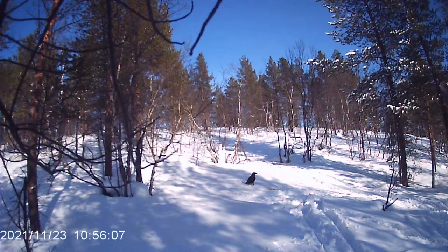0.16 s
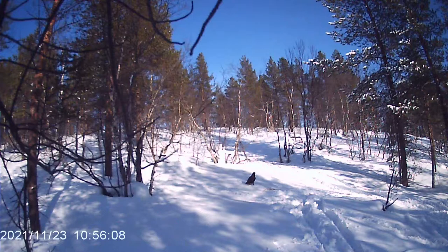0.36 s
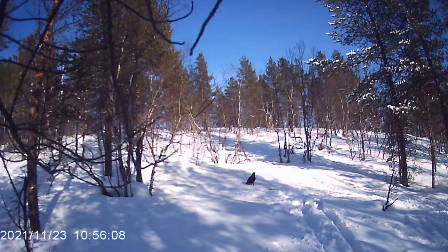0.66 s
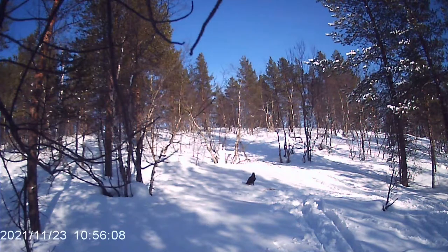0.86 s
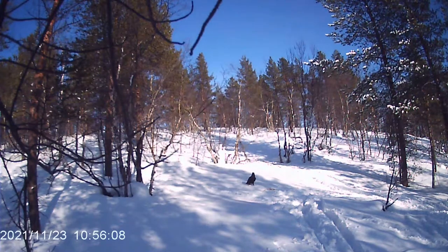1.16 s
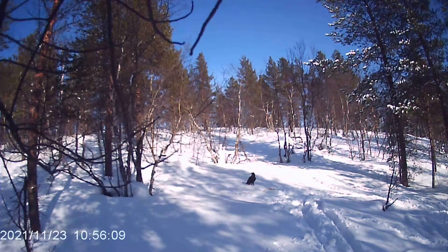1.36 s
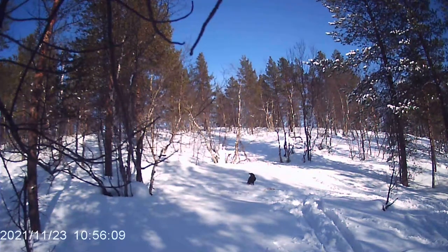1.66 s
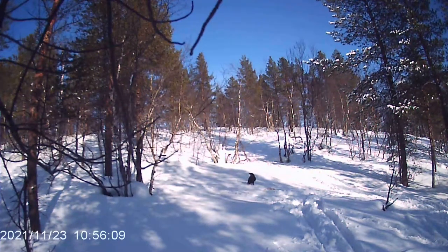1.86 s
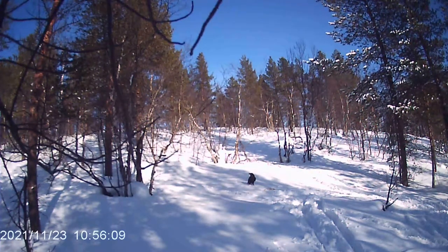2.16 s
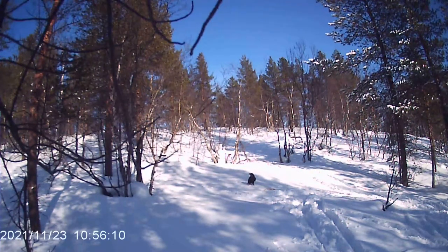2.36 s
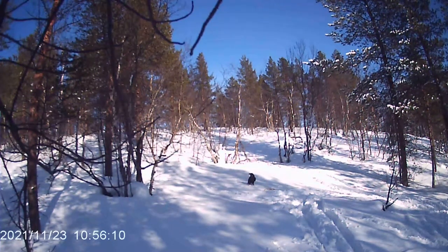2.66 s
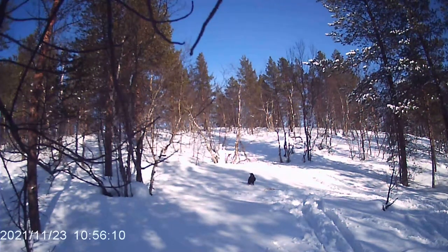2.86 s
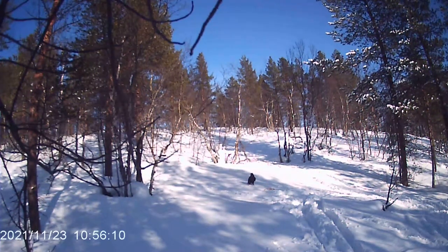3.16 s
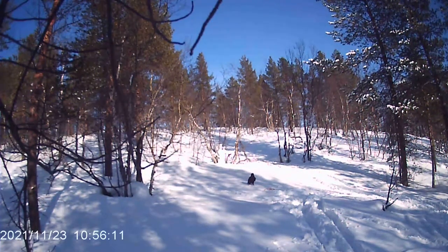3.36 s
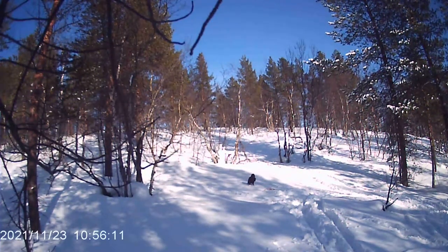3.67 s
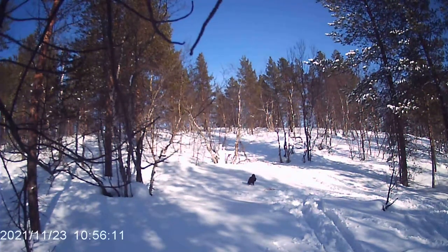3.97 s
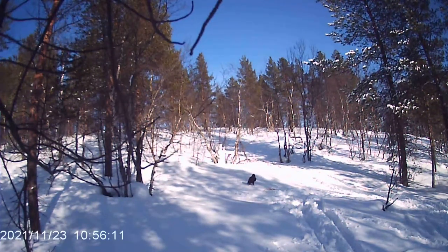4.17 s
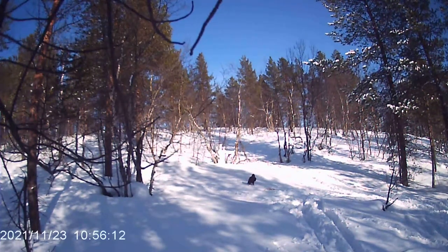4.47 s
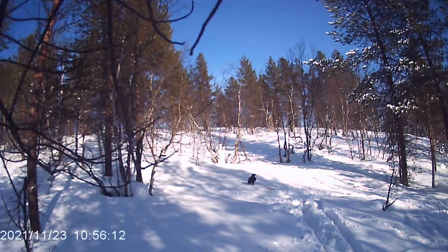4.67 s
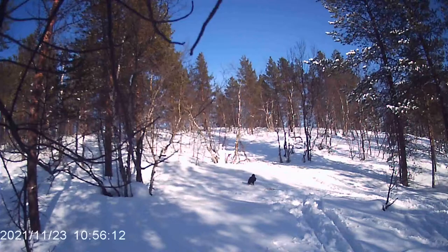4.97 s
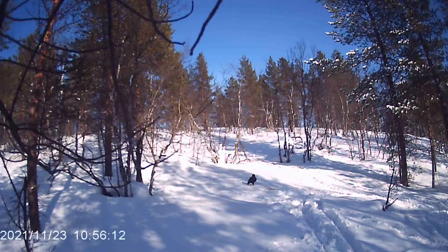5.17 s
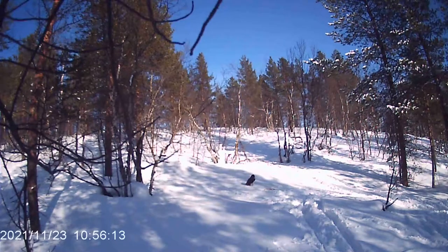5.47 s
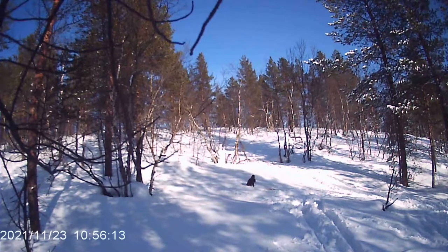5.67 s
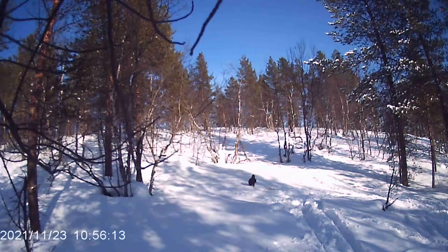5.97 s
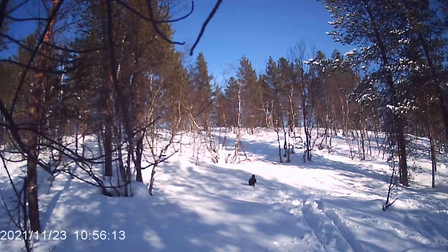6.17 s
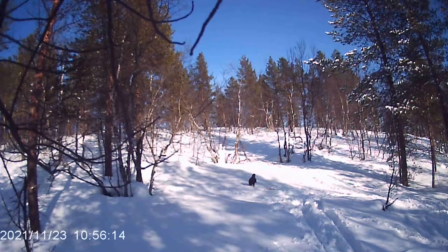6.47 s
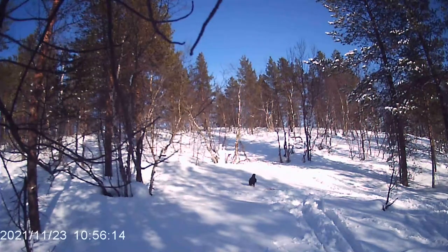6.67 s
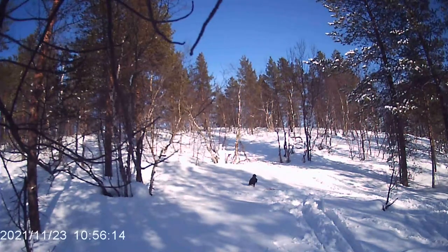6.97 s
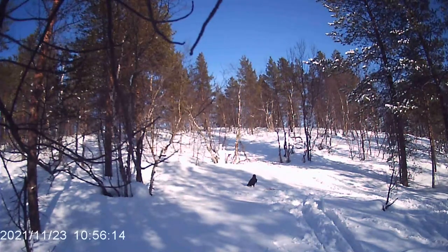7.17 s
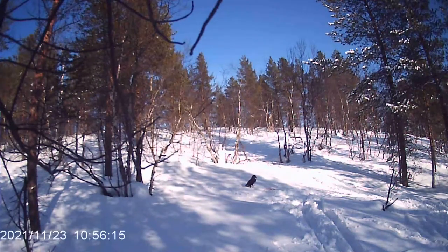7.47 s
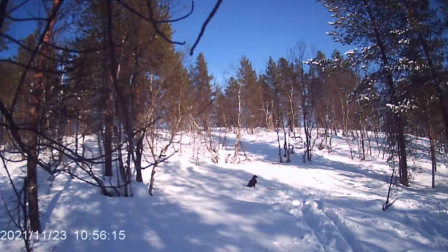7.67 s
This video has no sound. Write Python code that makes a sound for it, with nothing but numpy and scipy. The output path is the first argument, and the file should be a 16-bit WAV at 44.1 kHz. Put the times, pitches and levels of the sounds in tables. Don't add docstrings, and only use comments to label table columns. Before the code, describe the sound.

Outdoors in a snowy wood, a camera's steady hiss and thin buzzing whine lie under everything. Small tits give quick, high, dipping whistles and raspy nasal notes, mostly in the first three seconds. Icy twigs snap and tick. Midway a raven utters two short, rattling croaks close together, the second slightly louder, with a soft forest echo. Late on, two nasal tit notes answer each other.

```python
import sys
import numpy as np
from scipy import signal
from scipy.fft import rfft, irfft
from scipy.io import wavfile
from scipy.ndimage import uniform_filter1d

SR = 44100
rng = np.random.default_rng(int(sys.argv[2]) if len(sys.argv) > 2 else 0)


def put_to_file(sound):
    columns = np.atleast_2d(sound).T
    safe = np.clip(columns, -1, 1)
    whole_steps = np.round(safe * 32767)
    wavfile.write(sys.argv[1], SR, whole_steps.astype(np.int16))


def gain_from_decibels(decibels):
    exponent = np.asarray(decibels, float) / 20
    return 10 ** exponent


N = 345303


def band(x, hz, width_hz):
    edges = np.clip([hz - width_hz / 2, hz + width_hz / 2], 20, .45 * SR)
    y = signal.sosfilt(signal.butter(2, edges, "band", fs=SR, output="sos"), x)
    return y / np.std(y)


def add(out, start_s, piece):
    i = int(start_s * SR)
    out[i:i + len(piece)] += piece[:N - i]


def tone(hz):
    return np.sqrt(2) * np.sin(2 * np.pi * np.cumsum(hz) / SR)


def note(points):
    s, hz, db = np.transpose(points)
    t = np.arange(s[0], s[-1], 1 / SR)
    ends = np.clip(np.minimum(t - s[0] + 0.0034, s[-1] - t) / 0.001, 0, 1)
    pitch_hz = uniform_filter1d(np.interp(t, s, hz), size=60, mode="nearest")
    return pitch_hz, gain_from_decibels(np.interp(t, s, db)) * ends


# start_s, burst_spacing_s, peak_db, top_pitch_hz, bursts_to_full_effort
CROAKS = [
    (4.496, .0256, -39, 506, 4.7),
    (4.9295, .0254, -36.5, 495.3, 3.56),
]
BURSTS = 9


def bursts():
    rows, k = [], np.arange(BURSTS)
    short_s, long_s = 0.0118, 0.0174
    slack_click_db, full_click_db = -2, -16
    for start_s, spacing_s, peak_db, top_hz, full in CROAKS:
        late, loud, high, bright = rng.standard_normal((BURSTS, 4)).T
        slack = np.clip(1 - k / full, 0, 1)
        tired = np.clip((k - full) / (BURSTS - 1 - full), 0, 1) ** 2
        burst_s = start_s + spacing_s * k + .001 * late
        level_db = peak_db - 6 * slack - 0.5 * tired + .9 * loud
        pitch_hz = top_hz * (1 - 0.213 * slack - 0.074 * tired + .012 * high)
        third_db = -1.5 - 5 * tired + .9 * bright
        length_s = long_s + (short_s - long_s) * slack
        click_db = full_click_db + (slack_click_db - full_click_db) * slack
        rows += zip(burst_s, level_db, pitch_hz, third_db, length_s, click_db)
    return rows


# centre_hz, width_hz, level_db
THROAT = [(430, 340, -5), (995, 200, 1), (1260, 230, 2), (1440, 270, -5)]


def throat(hz):
    return np.sqrt(sum(gain_from_decibels(2 * db) / (1 + (2 * (hz - centre_hz) / width_hz) ** 4)
                       for centre_hz, width_hz, db in THROAT))


def raven():
    out = np.zeros(N)
    rise, sag = 0.061, 0.22
    chance = rng.standard_normal((len(CROAKS) * BURSTS, 1500))
    for (start_s, level_db, top_hz, third_db, length_s, click_db), noise in zip(bursts(), chance):
        u = np.arange(int(length_s * SR)) / (length_s * SR)
        gate = np.clip(u / .13, 0, 1) ** 2 * np.clip((1.02 - u) / .25, 0, 1)
        hz = top_hz * (1 - np.interp(u, [0, .3, .5, 1], [rise, 0, 0, 1]) ** 1.37 * sag)
        hz = hz * (1 + .1 * uniform_filter1d(noise, size=80)[:len(u)])
        first = throat(hz) * tone(hz)
        second = throat(2 * hz) * gain_from_decibels(-20 * np.clip(u - .33, 0, 1)) * tone(2 * hz)
        third = throat(3 * hz) * gain_from_decibels(third_db + 2.0 - 10.0 * (1 - u)) * tone(3 * hz)
        fourth = throat(4 * hz) * gain_from_decibels(-4.5) * tone(4 * hz)
        click = gain_from_decibels(click_db) * band(noise, 2000, 3300)[:len(u)] * np.exp(-u * length_s / 0.0015)
        add(out, start_s, gain_from_decibels(level_db - 6.5) * (gate * (first + second + third + fourth) + click))
    return out


# dip_s, pitch_hz, dip_depth_hz, peak_db, upper_voice_db
FLICKS = [(1.088, 6930, 680, -46, -18), (1.337, 7130, 300, -60, -10), (1.471, 7250, 750, -50.5, -19),
          (3.219, 6960, 100, -61, -20), (3.298, 7140, 770, -60, -18), (4.136, 6960, 420, -58, -10),
          (4.214, 7300, 640, -55.5, -10), (4.514, 7370, 680, -57, -5), (4.586, 7530, 510, -57.5, -8),
          (6.31, 7100, 460, -62, -15), (6.412, 7040, 1010, -53, -20), (7.799, 7620, 1460, -51.5, -17)]


def flick(dip_s, hz, depth_hz, peak_db):
    shoulder_db = peak_db - 10.5 * depth_hz / 1000
    back_hz = hz - max(depth_hz - 750, 0)
    return [(dip_s - 0.029, hz + 250, shoulder_db - 9),
            (dip_s - .007, hz, shoulder_db),
            (dip_s, hz - depth_hz, peak_db),
            (dip_s + 0.0064, back_hz, (peak_db + shoulder_db) / 2 - 2.5),
            (dip_s + 0.0167, back_hz - 750, peak_db - 13)]


# step_s, start_above_arch_hz, arch_hz, peak_db, upper_voice_db
STEPS = [
    (1.242, -260, 6960, -56, -22),
    (2.09, -200, 7050, -51.5, -34),
    (6.604, 300, 7120, -52, -13.5),
]


def step(step_s, start_hz, hz, peak_db):
    lead_s, drop_hz, mid_db = .044, 480, -4
    return [(step_s - lead_s, hz + start_hz, peak_db - 11),
            (step_s - lead_s / 2, hz, peak_db + mid_db),
            (step_s - .008, hz, peak_db + mid_db / 2),
            (step_s, hz - drop_hz, peak_db),
            (step_s + 0.015, hz - drop_hz, peak_db - 14)]


# plunge_s, top_hz, depth_hz, peak_db, hold_re_peak_db
PLUNGES = [
    (1.424, 6400, 2740, -50, -13),
    (2.229, 6980, 2090, -49.5, -7),
    (3.037, 7280, 1660, -50.5, -12.5),
]


def plunge(plunge_s, hz, depth_hz, peak_db, hold_db):
    fall_s = 0.029
    return [(plunge_s - .025, hz, peak_db + hold_db),
            (plunge_s, hz, peak_db + hold_db),
            (plunge_s + fall_s / 2, hz - 0.47 * depth_hz, peak_db),
            (plunge_s + fall_s, hz - depth_hz, peak_db - 11.5)]


# start_s, length_s, from_hz, to_hz, peak_db
GLIDES = [
    (1.392, .01, 3740, 7700, -55),
    (1.397, .009, 3900, 6940, -54),
    (1.435, .02, 6930, 5300, -56),
    (1.443, .02, 5600, 5200, -52),
    (3.003, .012, 5500, 7300, -53),
    (4.522, .012, 7600, 6900, -62),
    (7.72, .014, 4200, 8000, -52.5),
]


def glide(start_s, length_s, from_hz, to_hz, peak_db):
    return [(start_s, from_hz, peak_db - 9.5),
            (start_s + length_s / 2, (from_hz + to_hz) / 2, peak_db),
            (start_s + length_s, to_hz, peak_db - 9.5)]


def slides():
    faint_upper_db = -24
    shapes = [(flick(*row), upper_db) for *row, upper_db in FLICKS]
    shapes += [(step(*row), upper_db) for *row, upper_db in STEPS]
    shapes += [(plunge(*row), faint_upper_db) for row in PLUNGES]
    shapes += [(glide(*row), faint_upper_db) for row in GLIDES]
    out = np.zeros(N)
    for points, upper_db in shapes:
        hz, gain = note(points)
        upper = gain_from_decibels(upper_db) * (gain / np.max(gain)) ** 0.2 * tone(1.28 * hz)
        add(out, points[0][0], gain * (tone(hz) + upper))
    return out


def dee_shape(start_s, fall_s, end_s, hz, peak_db, open_hz):
    slip_s = fall_s + 0.01804
    s = np.array([start_s, start_s + .028, fall_s, slip_s, (slip_s + end_s) / 2, end_s])
    heard_s = np.maximum(s, 0)
    pitch_hz = hz - np.array([330, -open_hz, 0, 220, 450, 1000])
    level_db = peak_db + np.array([-11.5, -2, 0, -5, -7.5, -16])
    return np.transpose([heard_s, np.interp(heard_s, s, pitch_hz), np.interp(heard_s, s, level_db)])


# start_s, fall_s, end_s, lead_partial_hz, peak_db
DEES = [
    (-.12, -.012, .066, 4000, -50.5),
    (.195, .335, .43, 3690, -55),
    (1.58, 1.716, 1.78, 3830, -55),
    (1.853, 1.921, 1.965, 3660, -55.5),
    (3.489, 3.572, 3.665, 3720, -56),
    (6.73, 6.868, 6.93, 3870, -49.5),
    (7.003, 7.112, 7.195, 3690, -51.5),
    (.58, 0.747, .83, 3830, -70.5),
    (5.869, 6.05, 6.11, 3710, -71),
]
DEE_OPEN_HZ = [0, 20, -60, 40, 50, -70, 90, 0, 0]
# clear_share, break_s, broken_share, strand_share (shares 0-1)
HOARSE = [(.55, .03, .7, .3), (.45, .34, .6, .3), (.35, 1.648, .92, .9), (.45, 1.93, .65, .4),
          (.35, 3.58, .85, .5), (.3, 6.875, .85, .3), (.45, 7.14, .6, .3), (.7, .7, .8, .3),
          (.6, 6., .6, .3)]
# partial_number, level_re_lead_db
DEE_STACK = [(5, -17), (7, -14), (8, -23), (9, -19), (10, -24)]


def dees():
    out = np.zeros(N)
    shiver, drift, rasp, haze = (band(rng.standard_normal(N), hz, width_hz) for hz, width_hz in
                                 [(110, 160), (40, 40), (300, 560), (150, 260)])
    split = tone(195 + 25 * drift)
    for row, open_hz, (clear, break_s, broken, strands) in zip(DEES, DEE_OPEN_HZ, HOARSE):
        points = dee_shape(*row, open_hz)
        hz, gain = note(points)
        start = int(points[0][0] * SR)
        at = slice(start, start + len(hz))
        t = np.arange(N)[at] / SR
        hoarse = np.interp(t, [break_s - .01, break_s + 0.02], [clear, broken])
        steady = np.sqrt(1 - hoarse ** 2)
        hz = hz * (1 + .008 * shiver[at]) * (1 + .008 * drift[at])
        rough = strands * split[at] + np.sqrt(1 - strands ** 2) * rasp[at]
        lead = tone(hz) * (steady + hoarse * rough)
        sides = sum(gain_from_decibels(db) * tone(k * hz / 6) for k, db in DEE_STACK)
        flutter = gain_from_decibels(1.2 * drift[::-1][at])
        out[at] += flutter * gain * (lead + sides * (steady + 1.2 * hoarse * haze[at]))
    return out


# peak_db, centre_hz, width_hz, length_s
SNAP = [
    (-38, 4200, 500, .0036),
    (-42.5, 3260, 380, 0.0037),
    (-40, 5800, 900, .004),
    (-51, 7100, 600, .003),
    (-53, 8600, 500, .002),
    (-48, 5000, 800, .0037),
    (-41.5, 1920, 400, 0.0072),
]
# start_s, peak_db, centre_hz, width_hz, length_s
TICKS = [(1.563, -52, 5300, 1500, .003), (2.3038, -49, 4200, 3020, .003), (2.48, -54, 6200, 2000, .002),
         (2.5333, -42.5, 4930, 3600, .0038), (2.538, -50, 4500, 4000, .004),
         (3.8895, -42.5, 5300, 2500, .00095), (4.464, -51, 6000, 2500, .002),
         (5.387, -51, 5990, 1510, .0012), (5.3934, -34, 6700, 1813, 0.0014),
         (5.3936, -45, 10500, 3000, 0.00079), (5.987, -50, 4500, 5000, .002),
         (6.305, -53, 4300, 1500, .003), (6.555, -56, 7300, 2000, .002), (6.644, -44, 5500, 6000, .0027),
         (6.885, -55, 6500, 1480, .002), (7.696, -53, 4500, 4000, .002)]


def ticks():
    snap_s = .9158
    rows = [(snap_s, *ring) for ring in SNAP] + TICKS
    out = np.zeros(N)
    chance = rng.standard_normal((len(rows), 1500))
    for (start_s, peak_db, hz, width_hz, length_s), noise in zip(rows, chance):
        t = np.arange(len(noise)) / SR
        crack = band(noise, hz, width_hz) * np.clip(t / 0.00034, 0, 1) * np.exp(-(t / length_s) ** 2)
        add(out, start_s, gain_from_decibels(peak_db) * crack / np.max(np.abs(crack)))
    return out


def scatter(x, level_db):
    smear = rng.standard_normal(700) * np.hanning(700)
    return gain_from_decibels(level_db) * signal.fftconvolve(x, smear / np.sqrt(np.sum(smear ** 2)))[:N]


def forest(x):
    low_t60_s, high_t60_s = 1.2, 0.59
    t = np.arange(int(1.2 * SR)) / SR
    tail = rng.standard_normal(len(t)) * np.clip((t - .01) / .03, 0, 1)
    low = band(tail, 1090, 1760) * gain_from_decibels(-60 * t / low_t60_s)
    high = gain_from_decibels(-2.0) * band(tail, 8000, 8000) * gain_from_decibels(-60 * t / high_t60_s)
    return signal.fftconvolve(x, (low + high) / np.sqrt(np.sum(low ** 2)))[:N]


# freq_hz, density_db_per_hz
HISS = [(16, -65), (60, -72.5), (150, -82.5), (400, -82.5), (1500, -96), (2800, -100), (13500, -110.5),
        (15600, -117)]
# centre_s, peak_db, pitch_hz, length_s
KNOCKS = [
    (.36, -26.5, 22, 0.032),
    (2.43, -38, 28, .05),
    (5.28, -48.5, 173, 0.037),
]
WHINE = [(1, -59.5), (3, -70), (5, -75.5), (7, -78), (8, -80), (9, -80), (11, -84), (13, -88), (15, -90),
         (16, -91), (17, -92), (19, -96)]


def camera():
    hz, db = np.transpose(HISS)
    f = np.maximum(np.fft.rfftfreq(N, 1 / SR), 1)
    shape = gain_from_decibels(np.interp(np.log(f), np.log(hz), db)) * np.sqrt(SR / 2)
    out = irfft(rfft(rng.standard_normal(N)) * shape, N)
    t = np.arange(N) / SR
    for centre_s, peak_db, knock_hz, length_s in KNOCKS:
        since_s = t - centre_s
        swell = np.exp(-(since_s / length_s * 2) ** 2)
        out += gain_from_decibels(peak_db) * np.sin(2 * np.pi * knock_hz * since_s) * swell
    frame_hz, rows_hz, read_start_s, read_share = 25, 703.4, .0105, .79
    since_s = (t - read_start_s) % (1 / frame_hz)
    reading = uniform_filter1d(1. * (since_s * frame_hz < read_share), size=8)
    whine = sum(gain_from_decibels(db) * np.sqrt(2) * np.sin(2 * np.pi * k * rows_hz * since_s) for k, db in WHINE)
    supply = gain_from_decibels(-61) * (reading - read_share)
    return out + reading * whine + supply


def scene():
    croak, whistles = raven(), slides()
    small = whistles + dees() + ticks()
    tail = forest(gain_from_decibels(-18.5) * croak + gain_from_decibels(-17.5) * small)
    out = croak + small + tail + camera()
    add(out, 0.022, scatter(whistles, -14.5))
    add(out, 0.00407, scatter(croak, -9.5))
    return out[None]


def roll_off(x):
    return signal.sosfilt(signal.butter(12, 15620, fs=SR, output="sos"), x)


def record(dry):
    top_hz, offset = 15600, -.0503
    cut = signal.sosfilt(signal.ellip(10, .1, 60, top_hz, fs=SR, output="sos"), dry)
    return roll_off(cut + offset)


dry = scene()
out = record(dry)
put_to_file(out)
```